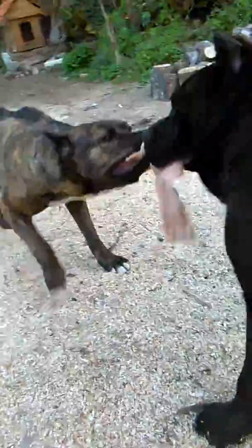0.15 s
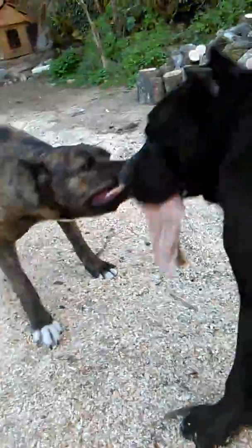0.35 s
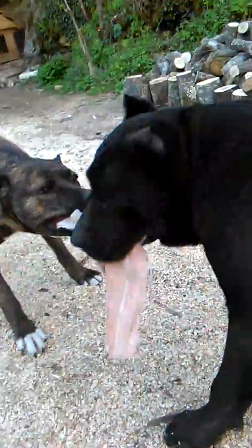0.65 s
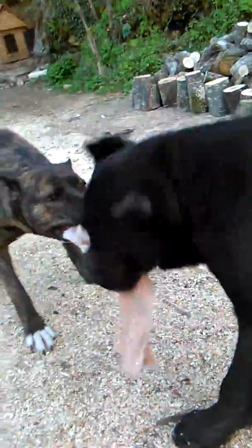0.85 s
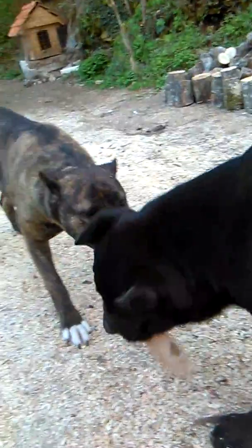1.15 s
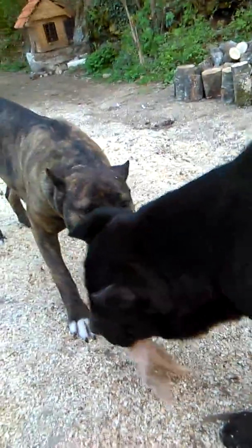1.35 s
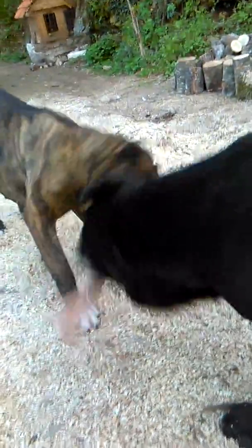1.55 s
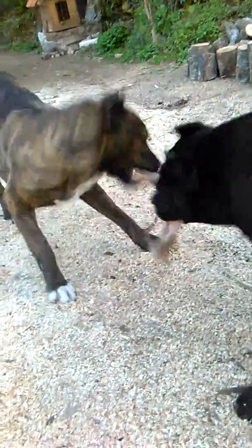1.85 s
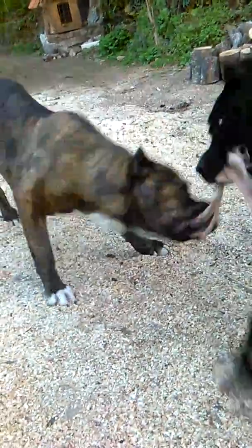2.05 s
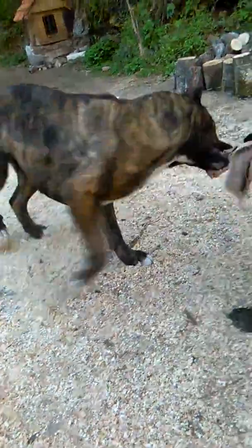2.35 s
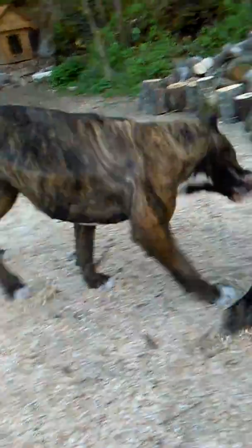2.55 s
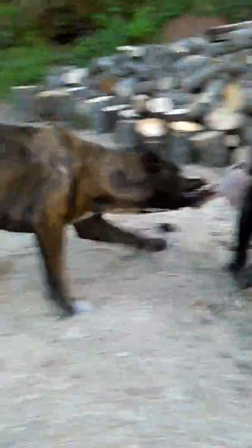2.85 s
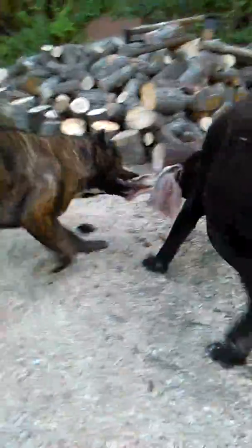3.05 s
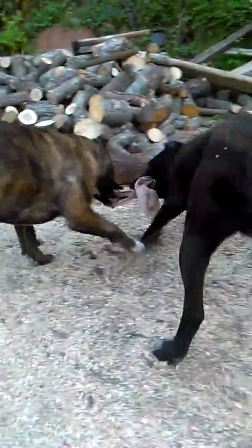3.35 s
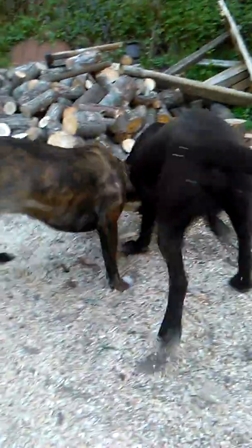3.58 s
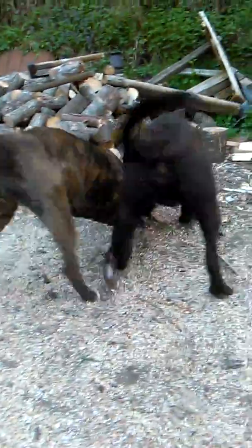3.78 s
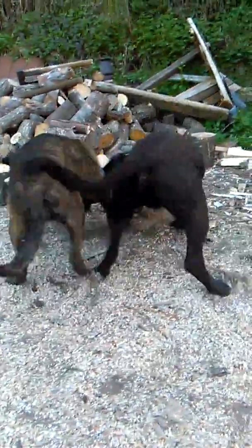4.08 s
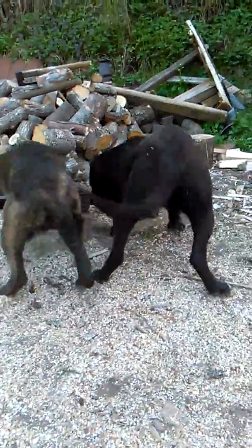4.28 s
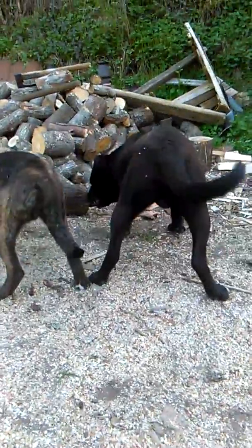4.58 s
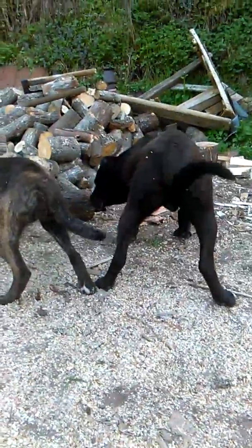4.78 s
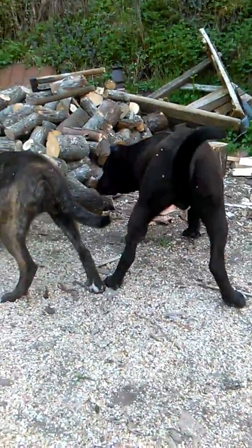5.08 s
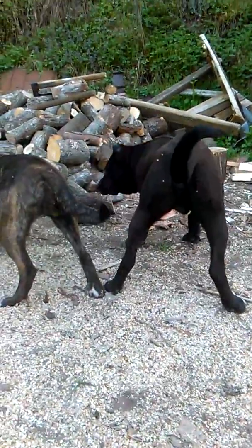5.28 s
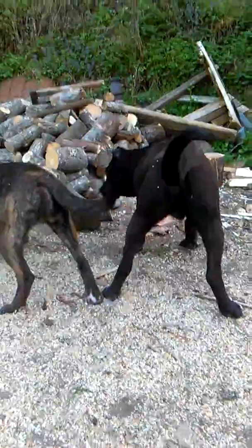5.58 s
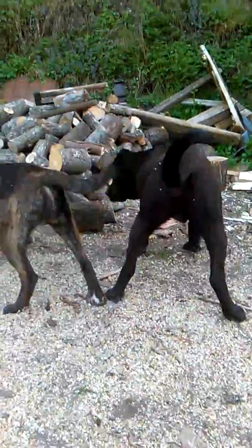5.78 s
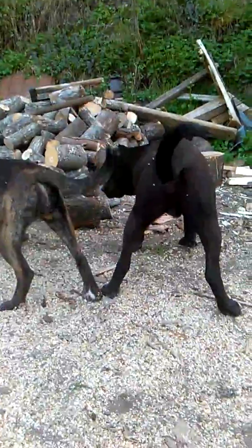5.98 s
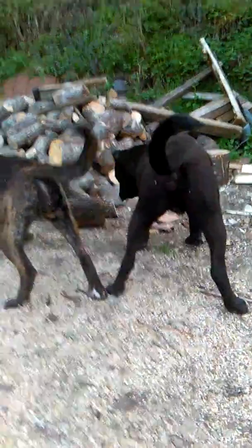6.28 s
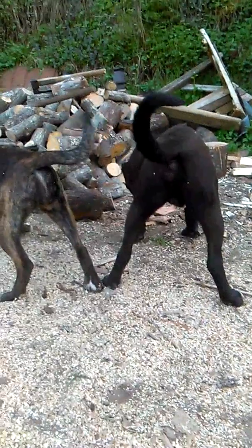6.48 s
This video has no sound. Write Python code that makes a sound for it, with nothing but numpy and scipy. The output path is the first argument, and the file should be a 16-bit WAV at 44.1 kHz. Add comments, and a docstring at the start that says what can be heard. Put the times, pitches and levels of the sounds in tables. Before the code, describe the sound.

Two large dogs snort and growl over a tug of war, rising to rough snarls as paws scuff gravel and a small bird pipes.

```python
"""A gravel yard, the microphone a few steps from two large dogs tugging at a rag.
They snort, then growl: first low with the jaws shut, then in rough open snarls, then three short grunts.
Slack vocal folds slap unevenly and ring belly, chest and mouth; air rasps through the muzzle.
Paws scuff the pebbles, which click together. Beyond the dogs a small bird pipes a plain note
and others answer from farther off, over a steady outdoor hiss."""
import sys
import numpy as np
from scipy import signal
from scipy.fft import rfft, irfft, next_fast_len
from scipy.io import wavfile
from scipy.ndimage import uniform_filter1d

SR = 44100
rng = np.random.default_rng(int(sys.argv[2]) if len(sys.argv) > 2 else 0)


def log_audio(samples):
    """Write samples as a 16-bit WAV file to the path given in sys.argv[1]."""
    # one column per channel
    frames = np.atleast_2d(samples).T
    # limit to full scale, then quantise
    limited = np.clip(frames, -1, 1)
    pcm = np.round(limited * 32767).astype(np.int16)
    wavfile.write(sys.argv[1], SR, pcm)


N = 292262
TIME = np.arange(N) / SR


def growls():
    """The dogs' voices, a few steps from the microphone: one push of breath for each growl."""
    # start/s, attack/s, hold/s, release/s, sag over the hold/dB; then, at full effort: belly/dB, chest/dB,
    # mouth/dB, cheeks/dB, rasp/dB, chest resonance/Hz, flap rate/Hz; last, roughness/0-1
    breaths = [ (2.488, 0.056, 0.25, 0.11, 2, -50.5, -48, -59.5, -62, -65, 154, 74, 0.3),
               (2.867, .09, 0.33, 0.039, 4, -51, -45.5, -56, -60.5, -60.5, 185, 68, 0.44),
               (3.505, 0.03, 0.032, 0.02, -2, -57, -50.5, -66, -70, -62, 169, 103, 0.25),
               (3.556, 0.048, 0.14, 0.055, 6, -49, -34.5, -34.5, -54.5, -53.5, 236, 111, 0.3),
               (3.787, 0.055, .14, 0.043, 1.5, -54, -44, -43, -57, -52, 155, 94, 0.67),
               (4.033, 0.0096, 0.066, 0.03, -3, -54, -44, -38.5, -46.5, -51.5, 205, 100, 0.7),
               (4.131, 0.004, 0.146, 0.023, 2, -49, -38, -33, -46.5, -44, 189, 95, .62),
               (4.27, 0.03, 0.078, 0.059, 2.5, -49.5, -40.5, -36.5, -50, -51.5, 180, 77, 0.64),
               (4.482, 0.012, .035, 0.091, 3.5, -55, -48, -51.5, -57.5, -57, 203, 89, .6),
               (4.641, 0.014, 0.044, 0.024, 6, -57, -45, -57, -65, -58, 140, 118, 0.23),
               (4.702, 0.013, 0.031, 0.025, 2, -64, -46.5, -58, -70, -61, 156, 134, 0.25),
               (4.753, 0.01, 0.013, 0.073, 3, -60, -45.5, -54.5, -65, -59, 146, 120, 0.27)]
    out = np.zeros(N)
    for row in breaths:
        add(out, *growl(*row))
    return out


def growl(start, attack, hold, release, sag_db, belly_db, chest_db, mouth_db, cheeks_db, rasp_db,
          chest_hz, flap_hz, rough):
    """The folds ring belly, chest, mouth and cheeks; air rasps in the muzzle. Gives start and sound."""
    length = attack + hold + release
    t = np.arange(-.05, length + .05, 1 / SR)
    push_db = effort(t, attack, hold, release, sag_db)
    belly_hz = min(.78 * flap_hz, 90)  # slower flaps reach deeper
    # more effort slows the flaps and raises the chest resonance (octaves per dB)
    flap_hz = flap_hz * 2 ** (-0.14 * push_db)
    chest_hz = chest_hz * 2 ** (0.1 * push_db)
    mouth_db = mouth_db - 17 * np.clip(1 - t / attack, 0, 1)  # the jaws open over the attack
    rasp_db = rasp_db - 9.5 * (2 * t / length - 1) ** 2  # the lips lift toward the middle
    gape = np.clip((rasp_db + 72) / 15, .2, 1.3)
    voice, puffs = folds(t, flap_hz, rough)
    loose_tissue, _ = folds(t, 0.78 * flap_hz, rough)  # the throat flaps at its own slower rate
    voice = voice + amp(-5) * rough * loose_tissue
    belly = band(voice, belly_hz, 129)
    cheeks = band(.5 * voice + puffs, 930, 1188, order=3)
    shake = amp(1.5 * wander(t, 33.3))  # the tugging head shakes cheeks and muzzle
    sound = (amp(belly_db + push_db) * steady(belly, 0.038)
             + amp(chest_db + push_db) * steady(chest(voice, chest_hz))
             + amp(mouth_db + 1.7 * push_db) * steady(mouth(start + t, voice, puffs, gape))
             + amp(cheeks_db + 0.81 * push_db) * shake * steady(cheeks)
             + amp(rasp_db) * shake * steady(muzzle(t, length, voice, puffs)))
    gate = np.sqrt(np.clip(np.minimum(t, length - t) / 0.0045 + .5, 0, 1))
    return start + t[0], sound * gate


def effort(t, attack, hold, release, sag_db, slack_db=17):
    """The push behind a growl in dB: it builds, sags while held, and lets go."""
    rising = np.clip(1 - t / attack, 0, 1)
    held = np.clip((t - attack) / hold, 0, 1)
    falling = np.clip((t - attack - hold) / release, 0, 1)
    return -slack_db * (rising ** 1.6 + falling ** 0.91) - sag_db * held


def folds(t, flap_hz, rough, jitter=.5, shimmer_db=7, leak=0.56):
    """Slack folds slap shut at uneven moments; a puff of air follows each slap. Gives voice and puffs."""
    cycles = np.cumsum(flap_hz * np.exp(jitter * rough * wander(t, 110))) / SR
    force = amp(shimmer_db * rough * wander(t, 80.3))
    slaps = np.diff(np.floor(cycles), prepend=0) * force
    airflow = np.sqrt(force) * (leak + np.exp(-(cycles % 1) / 0.35))
    puffs = unit(rng.standard_normal(len(t)) * airflow)
    return unit(slaps) + rough * puffs, puffs


def chest(voice, hz):
    """The chest booms broadly, under a narrow ring of the windpipe."""
    boom = resonate_twice(voice, hz, width_hz=150)
    windpipe = resonate(voice, 257, width_hz=40)
    return band(boom + amp(-9) * windpipe, 107, 289, order=6)


def mouth(t, voice, puffs, gape, jaw_wobble=0.024):
    """Mouth and pharynx resonances move with the jaw; a wide snarl adds turbulence across their band."""
    # path of the mouth resonance: t/s, f/Hz
    mouth_path = [(2.5, 730), (2.7, 726), (2.96, 610), (3.2, 584), (3.59, 630), (3.625, 550), (3.65, 557),
                  (3.68, 710), (3.72, 700), (3.86, 640), (3.92, 690), (3.98, 610), (4.05, 726), (4.11, 745),
                  (4.135, 680), (4.16, 776), (4.215, 775), (4.245, 670), (4.31, 713), (4.4, 730),
                  (4.52, 520), (4.73, 430)]
    mouth_hz = curve(mouth_path, t) * (1 + jaw_wobble * wander(t, 18.1))
    pharynx_hz = 435 * (1 + jaw_wobble * wander(t, 20))
    vowel = resonate(voice, mouth_hz, width_hz=70) - amp(-5) * resonate(voice, pharynx_hz, width_hz=52)
    turbulence = amp(-8) * gape * puffs
    return band(vowel + turbulence, 289.5, 814, order=11)


def muzzle(t, length, voice, puffs, lip_draw=0.11, quiver=0.034, flare_db=4):
    """Air rasps in the muzzle: its resonances climb as the lips draw back, and flare as they quiver."""
    # upper resonances of the muzzle: f/Hz, width/Hz, relative level/dB
    resonances = [(1840, 170, -2.5), (2084, 69, 5), (2330, 100, -0.5), (2680, 200, -1.5), (3450, 310, -1.5),
                  (4240, 440, -1)]
    drawn = 1 + lip_draw * (t / length - .5)
    breath = puffs + 0.27 * voice
    rasp = np.zeros(len(t))
    for hz, width_hz, db in resonances:
        gain = amp(db + flare_db * wander(t, 60.8))
        rasp += gain * resonate(breath, hz * (drawn + quiver * wander(t, 29.9)), width_hz)
    return band(rasp, 1240, 4250, order=3)


def jolts(voices, stall=0.33, stall_s=0.0087, surge=0.16, surge_s=0.028):
    """A dog jerks at the rag: the folds stall, one hard slap rings chest and mouth, the voice surges."""
    # jerks: t/s, chest level/dB, mouth level/dB, mouth f/Hz, mouth decay/s
    jerks = [(2.506, -60, -49, 714, 0.0052), (2.549, -43, -58, 725, .004), (2.617, -38, -45.5, 735, 0.0037),
             (2.713, -39, -56, 726, 0.0018), (2.936, -34.5, -53, 640, .002), (3.005, -38, -43.5, 603, .003),
             (3.041, -31, -48, 590, .002), (3.081, -32, -45.5, 557, 0.0052), (3.128, -33, -44, 580, 0.0028),
             (3.206, -33, -50, 620, 0.0022), (3.582, -40, -33, 690, 0.0034), (3.596, -44, -26, 664, 0.0036),
             (3.708, -39, -33.5, 700, 0.0042), (3.848, -28.5, -45, 646, 0.0014),
             (3.882, -29, -33, 629, 0.0019), (4.038, -45, -27.5, 810, 0.0011),
             (4.061, -29, -36, 620, 0.0013), (4.095, -46, -39, 729, 0.004),
             (4.1335, -31, -19.5, 474, 0.0013), (4.145, -36, -24, 540, 0.0035),
             (4.156, -39, -23.5, 787, 0.0028), (4.207, -31, -28, 810, 0.00089),
             (4.238, -31, -27, 520, 0.0011), (4.263, -34, -31, 665, 0.0014), (4.31, -45, -23, 737, 0.0032),
             (4.333, -48, -26.5, 680, 0.0025), (4.36, -36, -23, 715, 0.0013),
             (4.467, -35.5, -41, 450, 0.0017), (4.493, -42, -40.5, 520, 0.0016),
             (4.544, -56, -43, 346, 0.0014), (4.562, -43, -48, 350, 0.0017)]
    chest_hz, chest_decay = 170, 0.0025
    slaps, drive = np.zeros(N), np.ones(N)
    t = np.arange(2048) / SR
    for s, chest_db, mouth_db, mouth_hz, mouth_decay in jerks:
        add(drive, s - 0.98 * stall_s, -stall * puff(stall_s)[1])
        add(drive, s, surge * puff(surge_s)[1])
        for db, hz, decay in (chest_db, chest_hz, chest_decay), (mouth_db, mouth_hz, mouth_decay):
            envelope = t / decay * np.exp(1 - t / decay)
            add(slaps, s, amp(db) * envelope * np.sin(2 * np.pi * hz * t))
    return voices * np.maximum(drive, 0) + band(slaps, 80, 1730, order=3)


def groans(waver=.012, shimmer_db=1.0):
    """For a moment the folds swing evenly, and one clean partial glides through the roughness."""
    # clean pitches inside the snarls: t/s, length/s, from f/Hz, to f/Hz, level/dB
    glides = [(3.585, .085, 275, 245, -31.5), (3.655, .075, 240, 212, -36.5), (3.603, 0.064, 570, 548, -33),
              (3.672, 0.034, 417, 410, -40.5), (4.135, .05, 452, 446, -31.5), (4.185, .1, 444, 430, -37),
              (4.145, 0.034, 795, 783, -30)]
    out = np.zeros(N)
    for s, length, from_hz, to_hz, db in glides:
        t, shape = puff(length)
        hz = np.linspace(from_hz, to_hz, len(t)) * (1 + waver * wander(t, 70))
        tone = np.sin(2 * np.pi * np.cumsum(hz) / SR)
        add(out, s, amp(db + shimmer_db * wander(t, 88)) * shape * tone)
    return out


def squeaks():
    """Air squeezed between lips and teeth rings one narrow, gliding peak."""
    # lip squeaks: t/s, length/s, from f/Hz, to f/Hz, level/dB
    glides = [(3.0, 0.043, 2070, 2100, -58.5), (3.13, 0.075, 2260, 2290, -58),
              (4.063, 0.032, 3680, 3570, -53), (4.09, 0.015, 2060, 2080, -50),
              (4.135, .022, 1980, 1960, -46), (4.163, 0.03, 3420, 4200, -47),
              (4.195, 0.025, 2060, 2010, -40), (4.227, 0.019, 2690, 2550, -41),
              (4.274, .016, 2700, 2750, -42.5), (4.323, 0.016, 2700, 2500, -46.5),
              (4.344, 0.042, 3230, 3480, -47.5), (4.37, 0.049, 2240, 2240, -49)]
    out = np.zeros(N)
    for s, length, from_hz, to_hz, db in glides:
        t, shape = puff(length)
        hz = np.linspace(from_hz, to_hz, len(t))
        ring = resonate_twice(rng.standard_normal(len(t)), hz, width_hz=170)
        add(out, s, amp(db) * shape * steady(ring, 0.0098))
    return out


def snorts():
    """Air forced past the rag: a nasal ring, a hiss and a low flutter of the lips."""
    # snorts: t/s, length/s, ring level/dB, ring f/Hz, hiss level/dB, flutter level/dB
    blows = [(.05, 0.13, -61.5, 714, -55.5, -74), (0.329, 0.16, -64.5, 680, -77, -80),
             (0.575, 0.24, -62, 670, -81, -72), (1.61, 0.085, -61.5, 920, -77, -77),
             (2.009, 0.025, -57, 800, -55.5, -59), (2.028, 0.032, -68, 850, -52.5, -53),
             (2.087, 0.015, -49, 820, -49, -50), (2.094, 0.03, -52, 755, -52, -60)]
    # spectrum of the breath hiss: f/Hz, relative level/dB
    hiss_spectrum = [(50, -19), (260, -12), (450, -9), (1000, -6), (1700, 1), (3000, -4), (5000, -5.5),
                     (7500, -4), (11000, -14), (16000, -25)]
    out = np.zeros(N)
    for s, length, ring_db, ring_hz, hiss_db, flutter_db in blows:
        t, shape = puff(length)
        ring, hiss, flutter = rng.standard_normal((3, SR // 2))
        ring = unit(resonate_twice(ring, ring_hz, width_hz=190)[-len(t):])
        flutter = unit(resonate_twice(flutter, 155, width_hz=130)[-len(t):])
        hiss = unit(colour(hiss, hiss_spectrum)[:len(t)])
        add(out, s, shape * (amp(ring_db) * ring + amp(hiss_db) * hiss + amp(flutter_db) * flutter))
    return out


def gravel(clicks_per_pitch_per_s=700, ring_cycles=5.25):
    """Many pebbles of different sizes click together, swelling under each paw."""
    # loose gravel shifting underfoot: t/s, relative level/dB
    trample = [(1.9, -86), (2.2, -67.5), (2.6, -62.5), (3.05, -64.5), (3.35, -57.5), (3.7, -60),
               (4.4, -58.5), (4.7, -80), (5.1, -81)]
    # paw scuffs: t/s, length/s, relative level/dB
    scuffs = [(1.797, 0.059, -56.5), (2.025, 0.033, -50.5), (2.097, 0.041, -50.5), (2.142, 0.033, -55),
              (2.16, 0.098, -57.5), (2.829, 0.044, -57), (3.361, 0.0088, -52), (3.396, 0.086, -54),
              (3.542, 0.053, -56), (3.847, 0.049, -53.5), (3.902, 0.051, -58), (3.961, 0.026, -58),
              (4.028, 0.069, -60), (4.088, 0.027, -48.5), (4.105, 0.15, -52.5), (4.309, 0.08, -54),
              (4.403, 0.018, -62), (4.557, 0.011, -53)]
    # colour of the crunch: f/Hz, gain/dB
    crunch_colour = [(1500, -7), (3500, -9.5), (5200, -10), (7200, -1), (9000, -4), (11800, -7.5),
                     (13200, -17), (16000, -19)]
    push = amp(curve(trample, TIME))
    for s, length, db in scuffs:
        add(push, s, amp(db) * puff(length)[1])
    grains, t = np.zeros(N), np.arange(512) / SR
    for hz in np.geomspace(2500, 15000, num=24):
        clicks = np.zeros(N)
        when, softness, polarity = rng.random((int(clicks_per_pitch_per_s * N / SR), 3)).T
        clicks[(when * N).astype(int)] = amp(-4 * np.log(softness + 0.08)) * np.sign(polarity - .5)
        pebble = np.sqrt(hz) * np.exp(-t * hz / ring_cycles) * np.sin(2 * np.pi * hz * t)
        grains += signal.oaconvolve(clicks, pebble)[:N]
    return amp(-1.5) * push * steady(colour(grains, crunch_colour), 0.03)


def clacks(spread=1.12):
    """Pebbles, teeth and wood knock sharply; each knock rings briefly in a narrow band."""
    # knocks: t/s, peak level/dB, f/Hz, t60/s
    knocks = [(2.165, -40, 9400, 0.015), (2.158, -40, 6400, 0.042), (3.843, -35.5, 10100, 0.011),
              (3.853, -39, 6830, .025), (3.916, -42, 7430, .025), (4.042, -46, 7190, .02),
              (4.105, -33.5, 7500, 0.017), (4.326, -39.5, 6670, .025), (4.349, -43, 8500, .02),
              (4.364, -43, 10800, .018), (4.471, -47, 6800, .014), (4.493, -30.5, 2310, 0.028),
              (6.445, -46, 7800, 0.033)]
    out, t = np.zeros(N), np.arange(4096) / SR
    for s, db, hz, t60 in knocks:
        burst = rng.standard_normal(len(t)) * amp(-60 * t / t60)
        ring = band(burst, hz / spread, hz * spread, order=3)
        add(out, s, amp(db) * ring / abs(ring).max())
    return out


def near_bird(note_s=0.225, peak_s=0.1, ends_db=-12.5, lift_hz_per_s=100, dip_hz=35.2):
    """One bird pipes about once a second: each note swells and fades, its pitch dips and then lifts."""
    # notes: t/s, f/Hz, level at the crest/dB
    notes = [(0.035, 4380, -50.5), (1.221, 4400, -52.5), (2.282, 4394, -51.5), (3.551, 4360, -58),
             (4.681, 4365, -55.5), (5.615, 4347, -53)]
    out, t = np.zeros(N), np.arange(0, note_s, 1 / SR)
    swell_db = ends_db * abs(np.interp(t, [0, peak_s, note_s], [-1, 0, 1])) ** 1.94
    bend_hz = lift_hz_per_s * (t - peak_s) + dip_hz * (.5 - np.sin(np.pi * t / note_s))
    for s, hz, db in notes:
        add(out, s, whistle(t, hz + bend_hz, db + swell_db, waver=0.0054))
    return out


def far_birds():
    """Other birds answer from farther off with faint, less steady whistles."""
    # answers: t/s, length/s, f/Hz, relative level/dB
    answers = [(1.87, 0.16, 4070, -65), (2.879, 0.16, 4010, -66), (4.395, 0.1, 4150, -59),
               (4.59, 0.05, 4660, -59.5), (4.88, 0.18, 4480, -65.5)]
    out = np.zeros(N)
    for s, length, hz, db in answers:
        t, shape = puff(length)
        add(out, s, shape * whistle(t, hz, db, waver=0.0194))
    return out


def whistle(t, hz, db, waver):
    """A nearly pure note that wavers a little and flutters on its way through the trees."""
    phase = 2 * np.pi * np.cumsum(hz * (1 + waver * wander(t, 90.5))) / SR
    flutter_db = 2 * wander(t, 70)
    return np.sqrt(2) * amp(db + flutter_db) * np.sin(phase) * signal.windows.tukey(len(t), .25)


def yard_echo(x, t60):
    """Sparse scattered echoes come back from the woodpile and the bushes."""
    t = np.arange(SR // 2) / SR
    taps = rng.standard_normal(len(t)) * (rng.random(len(t)) < .04)
    taps *= (t > .006) * amp(-60 * t / t60)
    return signal.fftconvolve(x, taps / np.linalg.norm(taps))[:N]


def air(level_db=-55.5):
    """Steady outdoor hiss with a low rumble, behind everything."""
    # outdoor ambience: f/Hz, relative level/dB
    spectrum = [(25, -12), (45, -4.5), (80, -.5), (140, -.5), (250, -5), (400, -7), (750, -8), (1200, -9),
                (2300, -5.5), (4000, -9), (5400, -14), (7300, -14), (11500, -24.5), (15500, -27.5)]
    swell_db = .25 * wander(TIME, 4)
    return amp(level_db + swell_db) * unit(colour(rng.standard_normal(N), spectrum))


def amp(db):
    """Decibels to gain."""
    return 10 ** (np.asarray(db) / 20)


def unit(x):
    """Scales to rms 1."""
    return x / np.sqrt(np.mean(x ** 2) + 1e-20)


def steady(x, seconds=0.019):
    """Scales to a running rms of 1, keeping the flutter faster than the given time."""
    size = max(int(seconds * SR), 2)
    power = uniform_filter1d(uniform_filter1d(x ** 2, size), size)
    return x / np.sqrt(abs(power) + 1e-14)


def curve(points, t):
    """A line through (t/s, value) points, read at the times t."""
    return np.interp(t, *np.transpose(points))


def add(mix, s, sound):
    """Mixes a sound in at s seconds."""
    part = mix[max(round(s * SR), 0):][:len(sound)]
    part += sound[:len(part)]


def colour(x, points):
    """Filters by a spectrum of (f/Hz, gain/dB) points."""
    hz, db = np.transpose(points)
    size = next_fast_len(len(x), real=True)
    gain = amp(np.interp(np.log(np.fft.rfftfreq(size, 1 / SR) + 1), np.log(hz), db))
    return irfft(rfft(x, size) * gain, size)[:len(x)]


def band(x, low_hz, high_hz, order=4):
    """Causal band-pass."""
    return signal.sosfilt(signal.butter(order, [low_hz, high_hz], "band", fs=SR, output="sos"), x)


def resonate(x, hz, width_hz):
    """A resonance of gain 1 that follows the curve hz."""
    turn = np.exp(2j * np.pi * np.cumsum(hz * np.ones(len(x))) / SR)
    pole = np.exp(-np.pi * width_hz / SR)
    return 2 * (turn * signal.lfilter([1 - pole], [1, -pole], x / turn + 1e-18)).real


def resonate_twice(x, hz, width_hz):
    """Two like resonances in series, for steeper skirts."""
    return resonate(resonate(x, hz, width_hz), hz, width_hz)


def wander(t, per_s):
    """Smooth random drift of rms about 1."""
    knots = rng.standard_normal(2048)
    fine = signal.resample(knots, 8 * len(knots))
    return np.interp((t - t[0]) * per_s, np.linspace(0, len(knots), len(fine)), fine)


def puff(length):
    """Times and rounded envelope of a short burst."""
    t = np.arange(int(length * SR)) / SR
    return t, signal.windows.tukey(len(t), .7)


def scene():
    """Dogs and gravel close by, birds beyond, the farthest with the most echo; both channels alike."""
    close = jolts(growls()) + groans() + squeaks() + snorts() + gravel() + clacks()
    close_echo = amp(-10.5) * yard_echo(close, t60=0.28)
    bird, answers = near_bird(), far_birds()
    bird_echo = yard_echo(amp(-11) * bird + amp(-3) * answers, t60=0.63)
    mono = close + close_echo + bird + amp(-5) * answers + bird_echo + air()
    return np.array([mono, mono])


def record(dry, low_cut_hz=54, high_cut_hz=15780):
    """The microphone drops the deepest bass, and the top of the treble is cut off."""
    thin = signal.sosfilt(signal.butter(7, low_cut_hz, "high", fs=SR, output="sos"), dry)
    low_pass = signal.firwin(801, high_cut_hz, window=("kaiser", 9), fs=SR)
    return signal.oaconvolve(thin, low_pass[None], "same")


dry = scene()
out = record(dry)
log_audio(out)
```